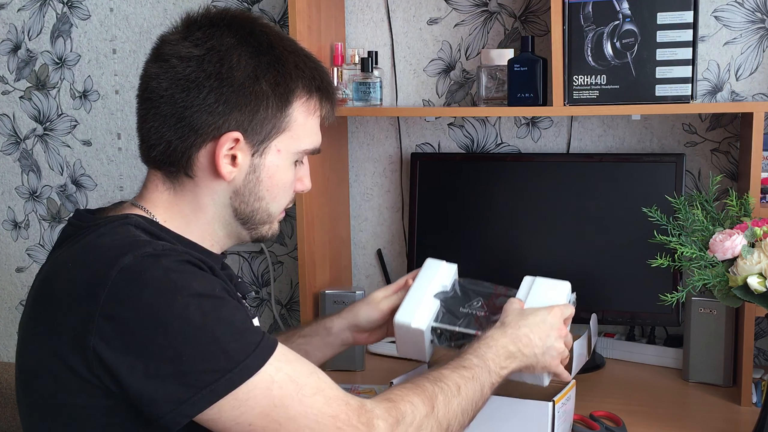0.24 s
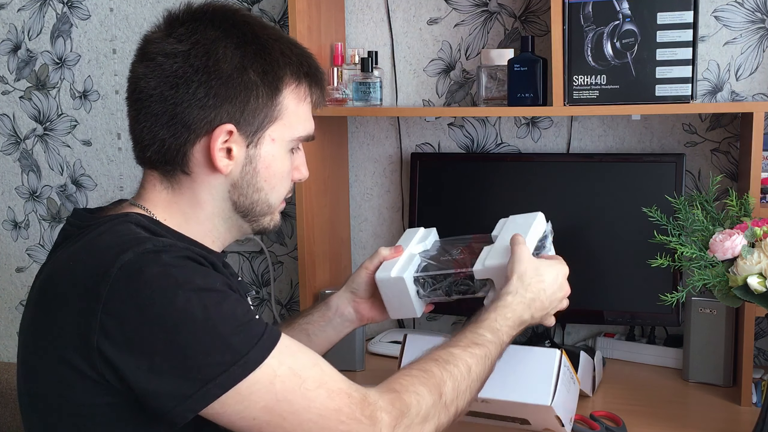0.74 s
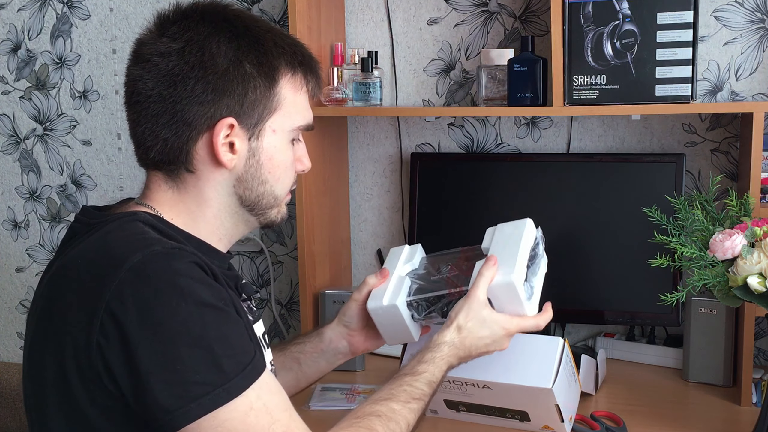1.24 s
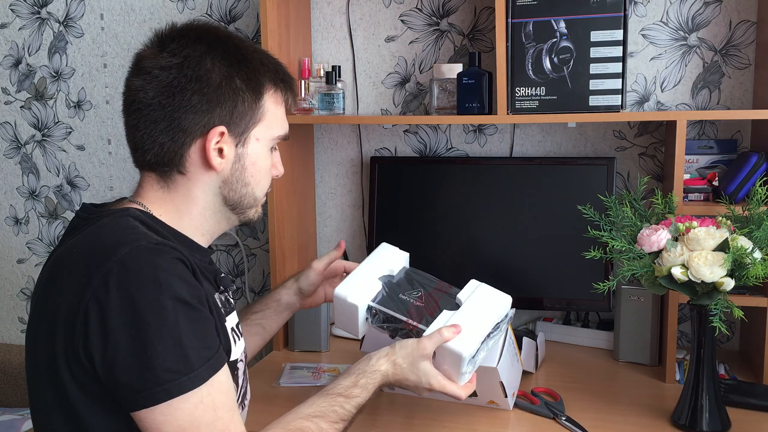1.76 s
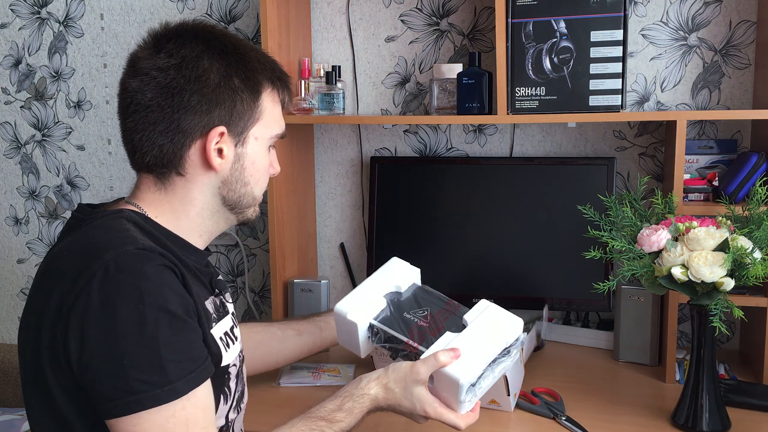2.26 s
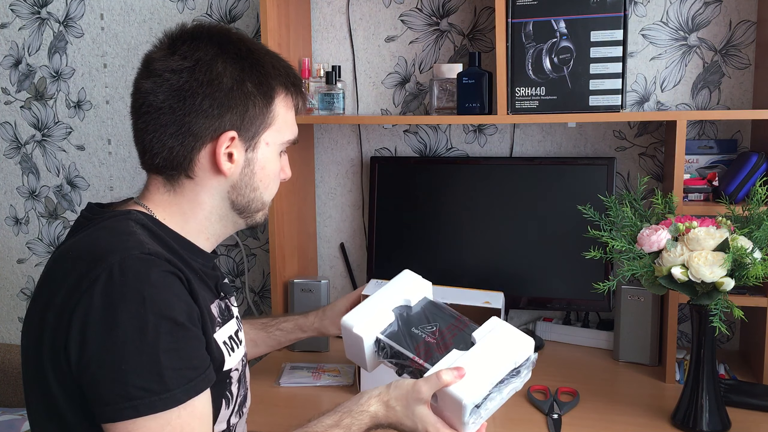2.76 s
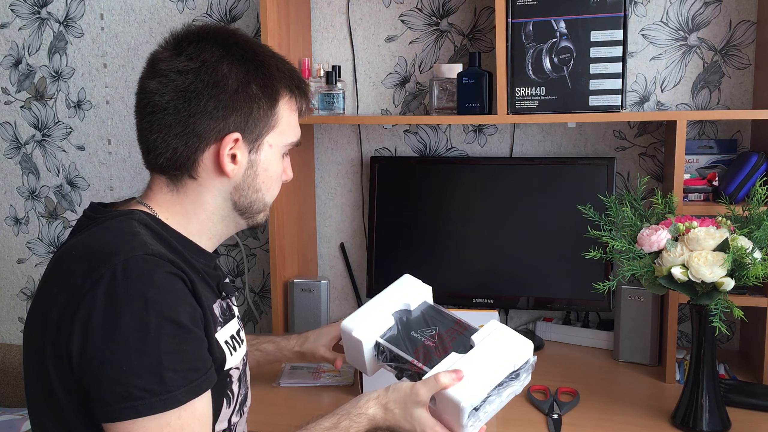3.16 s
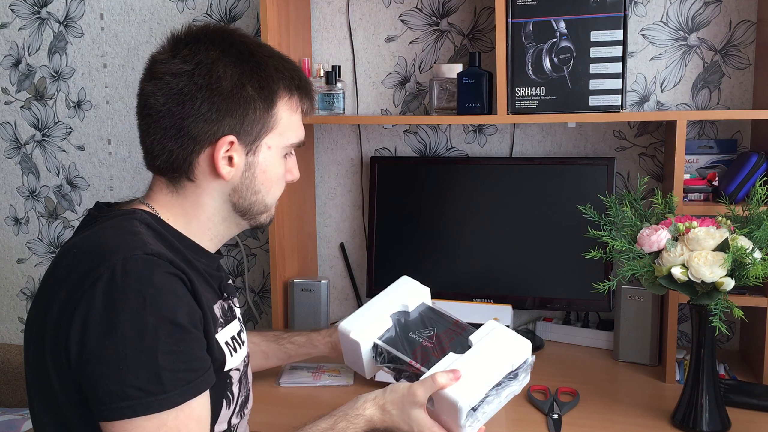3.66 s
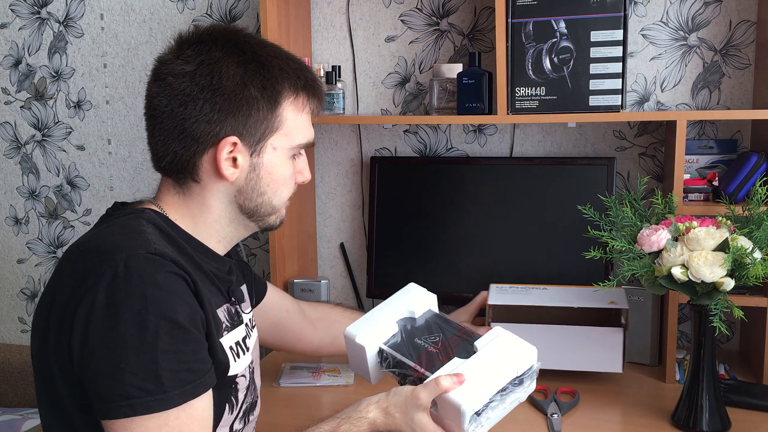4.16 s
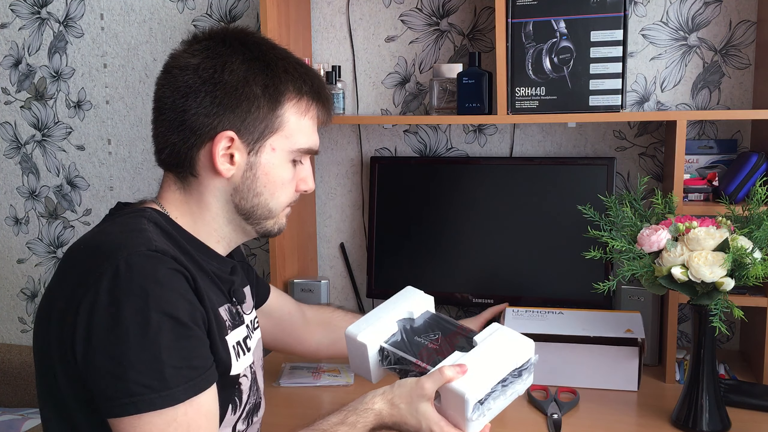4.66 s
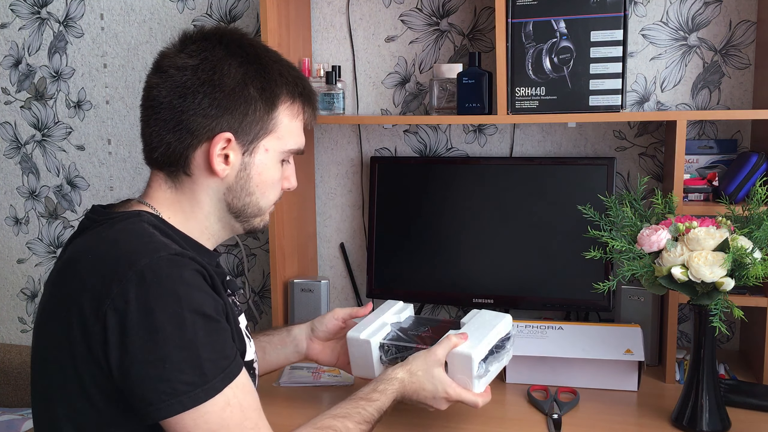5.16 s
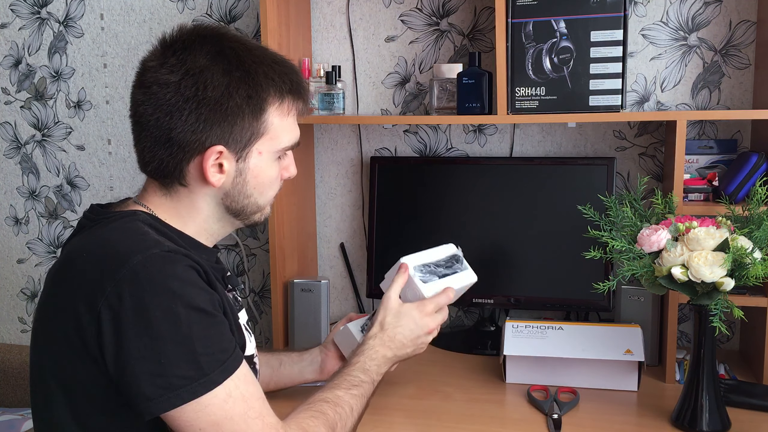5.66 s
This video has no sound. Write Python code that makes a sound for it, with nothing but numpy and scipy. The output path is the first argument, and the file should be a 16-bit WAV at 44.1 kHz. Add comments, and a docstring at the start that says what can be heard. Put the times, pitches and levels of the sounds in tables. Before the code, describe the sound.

Close unboxing sounds: hissing, crackling foam, hollow cardboard thuds with one very loud overloaded knock, card flaps snapping, finally foam creaks and faint squeaks.

```python
"""Unboxing from foam and cardboard

Hands lift a device in polystyrene end caps out of its cardboard box, in a small room.
The foam hisses, ticks, chirps and squeaks under the fingers: random slips, snaps and gliding tones.
The empty box drops, is dragged over the desk and knocks on it: damped modes, noise bursts, friction.
Card flaps swish and snap free. The hardest knocks overload a close microphone, whose gain ducks."""
import sys
import numpy as np
from scipy import signal
from scipy.fft import rfft, irfft, next_fast_len
from scipy.io import wavfile
from scipy.ndimage import map_coordinates

SR = 44100
rng = np.random.default_rng(int(sys.argv[2]) if len(sys.argv) > 2 else 0)


def wrap_up_sound(samples):
    """Save the sound to the file named by the first command line argument, as 16-bit audio."""
    columns = np.atleast_2d(samples).T
    # keep every value between -1 and 1, then stretch to whole-number steps
    tamed = np.clip(columns, -1, 1)
    steps = np.round(tamed * 32767).astype(np.int16)
    wavfile.write(sys.argv[1], SR, steps)


N = 260631

# Room tone spectrum: pitch_hz, level_db (per Hz)
TONE_SPECTRUM = [(300, -25), (520, -11.5), (3000, -3.5), (16000, -21.5)]
# Faint rumble spectrum: pitch_hz, level_db (per Hz)
RUMBLE_SPECTRUM = [(20, -11), (90, -40)]
# Decay of the diffuse room tail: pitch_hz, t60_s
ROOM_DECAY = [(130, 0.3), (1840, 0.26), (4850, 0.21), (14000, 0.13)]
# Furniture boards ringing along, each detuned a little: pitch_hz, level_db
SHELF_MODES = [(285, -2), (505, 1), (715, -13), (1053, 1), (1400, 2.5), (1950, -9.5), (2450, -7.5)]
SHELVES_DB = -20.5  # relative to the diffuse tail
SHELVES_T60_S, SHELVES_SCATTER = 0.38, 0.035  # scatter: typical detuning as a fraction of pitch
ALCOVE_S, ALCOVE_GAIN = 0.006, 0.23  # latest reflection from nearby boards, size of each

# Box pushed over the desk: start_s, length_s, drone_db, scratch_db (both before trims), panel_hz
PUSHES = [(0.0, 0.014, -21, -51, 1030), (0.759, 0.075, -18.5, -45, 780), (2.065, 0.072, -42.5, -50.5, 580),
          (2.23, 0.025, -20, -45, 776), (2.324, 0.064, -15.5, -50, 600), (2.393, 0.033, -16, -41, 576),
          (2.5, 0.88, -19.5, -51, 645), (2.904, 0.076, -21.5, -48.5, 978), (3.034, 0.12, -24, -74.5, 480),
          (3.505, 0.051, -20.5, -37, 488), (3.63, 0.051, -29, -50.5, 520), (3.716, 0.029, -20.5, -53, 469),
          (4.172, 0.034, -33, -57, 446), (4.438, 0.095, -22, -53, 519), (4.6, 0.029, -25, -43.5, 522),
          (4.748, 0.089, -19.5, -49.5, 495)]
# Low cardboard drone spectrum: pitch_hz, level_db (per Hz)
DRONE_SPECTRUM = [(80, -13.5), (130, -1.5), (200, -5.5), (290, 9), (520, 6.5), (800, -1.5), (1100, -3.5),
                  (1450, -6), (2400, -17), (3600, -49)]
# Fine grit spectrum: pitch_hz, level_db (per Hz)
SCRATCH_SPECTRUM = [(1300, -16), (2800, 4), (6500, -4), (16000, -18.5)]
PUSH_ATTACK_S, PUSH_SAG_DB_PER_S = 0.13, 56  # 60 dB of swell, then slowing while pushed
PANEL_Q, PANEL_DB = 3.7, -5  # dragged panel: sharpness, level relative to the rest of the drone

# Fingertips squeaking on foam: level_db, unevenness (of the slips, 0-1), glide [(time_s, slip_rate_hz), ..]
SQUEAKS = [(-45, .07, [(0.25, 6500), (0.35, 9300), (0.46, 9400)]), (-59, .006, [(5.51, 7100), (5.58, 7250),
           (5.72, 9100)]), (-58, .004, [(5.59, 10050), (5.65, 11100), (5.74, 11400)]),
           (-61, .004, [(5.51, 12700), (5.6, 12200), (5.66, 13300)]), (-54, .005, [(5.755, 10300),
           (5.82, 11200)]), (-57, .006, [(5.76, 13800), (5.83, 14800), (5.89, 14300)]),
           (-55, .005, [(5.78, 12900), (5.91, 12300)]), (-53, .06, [(5.77, 3400), (5.91, 3520)]),
           (-52, .07, [(5.78, 2200), (5.91, 2050)]), (-50, .25, [(5.74, 480), (5.91, 420)])]
SQUEAK_RAMP_S = 0.083  # 60 dB of swell or fall as a finger lands or lifts
# Fainter strands: fixed detuning and drift (fractions of pitch), level relative to the main strand
STRAND_SPREAD, STRAND_DRIFT, STRAND_DB = 0.06, 0.006, -7

# Foam slipping in the grip: start_s, level_db (snap peak), body_db (hollow answer relative to the snap)
TICKS = [(0.2216, -37, 13.5), (0.53, -25.5, 6.5), (0.609, -13, -1), (0.898, -33, -28), (1.116, -25, -8.5),
         (1.3145, -23, -6.5), (1.356, -8, -6), (1.6642, -31, -39), (5.373, -16.5, -7), (5.396, -21, -4),
         (5.447, -14, -6.5), (5.472, -13.5, -11.5), (5.495, -11.5, -7.5), (5.6674, -18, 2)]
# Bright snap of foam letting go: pitch_hz, level_db (per Hz)
SNAP_SPECTRUM = [(1000, -18), (2000, -2), (7200, -2), (16000, -7)]
# Hollow tone of the foam block: pitch_hz, level_db (per Hz)
HOLLOW_SPECTRUM = [(520, -0.5), (780, -1.5), (1200, -4), (2100, -6.5), (3000, -9)]

# Hands sliding on foam: fastest_s, half_length_s, hiss_db, hollow_db (both before trims)
RUBS = [(0.332, 0.067, -32.5, -32.5), (0.474, 0.072, -41.5, -33), (0.622, 0.16, -59, -43),
        (0.9, 0.023, -34, -29.5), (1.044, 0.05, -41.5, -31.5), (1.126, 0.043, -37, -38),
        (1.234, 0.049, -47, -36), (1.322, 0.0094, -32, -25), (1.375, 0.056, -39.5, -47),
        (1.553, 0.078, -51.5, -49.5), (1.94, 0.043, -61.5, -61), (5.306, 0.045, -32, -39.5),
        (5.385, 0.054, -36.5, -31.5), (5.624, 0.33, -53.5, -47), (5.836, 0.2, -67.5, -40.5)]
# Hiss of skin on beads: pitch_hz, level_db (per Hz)
HISS_SPECTRUM = [(1200, 6), (1900, 9.5), (2900, -5.5), (4000, 10), (9300, 7), (16000, 6)]
RUB_SHAPE, RUB_LINGER = 1.7, 0.9  # exponent of a stroke's bell, its fall over its rise

STUTTER_START_S, STUTTER_FIRST_GAP_S, STUTTER_LAST_GAP_S = 0.4655, 0.01, 0.006
STUTTER_SETTLE = 0.4  # share of the slack left after each slip
STUTTER_DB, STUTTER_GROWTH_DB = -20, 7.5  # full strength, how much weaker the first snap is

# Box on desk (the row at 1.352 s is the foam block, sounded alike): start_s, level_db (panel peak), panel_hz,
# edge_hz,
KNOCKS = [(0.72, -13, 750, 1625, -18, -8), (0.73, -16.5, 312, 1340, -30, -10.5),
          (0.767, -18, 490, 1410, -6, -7.5), (0.7941, -10, 758, 1420, -8, -14.5),
          (0.816, -17, 484, 1536, -13, 1.5), (0.893, -13.5, 757, 1370, -15.5, -22),
          (1.352, -19.5, 456, 1333, -11.5, -2.5), (2.073, -28, 612, 1178, -3, -5),
          (2.32, -13.5, 750, 1110, -6, -10), (2.381, -5.5, 623, 1510, -28, -4),
          (2.4, -10, 560, 1065, -13, 1), (2.465, 10.5, 658, 1480, -26, -4),
          (2.474, 1.5, 785, 1460, -16, 0.5), (2.508, -13, 720, 1423, -8, 3),
          (2.807, -17.5, 497, 1153, -15.5, -20.5), (2.8994, -8.5, 950, 1980, -9.5, 4),
          (3.018, -8.5, 425, 1129, -13, -22.5), (3.0245, -5.5, 502, 1350, -12, -7.5),
          (3.487, -14, 369, 1763, -25, -9.5), (3.497, -24.5, 970, 2760, -26, 1.5),
          (3.546, -17.5, 497, 1480, -4.5, -19), (3.676, -20, 506, 1410, -18, -11.5),
          (3.719, -17, 517, 1422, -34, 0.5), (4.178, -27, 429, 1426, -46, 5.5),
          (4.412, -2.5, 912, 1574, -24.5, -13), (4.574, -12, 523, 1170, -14.5, -18.5),
          (4.748, -6, 524, 1450, -44, -6)]
# Cardboard panel modes, level varied per blow: pitch_hz, level_db, t60_s
PANEL_MODES = [(311.7, -7.5, 0.12), (362, -2.5, 0.013), (487, -2, 0.01), (755, -10.5, 0.0028)]
# Loose panels rattling: pitch_hz, level_db (per Hz)
RATTLE_SPECTRUM = [(230, -9), (330, 7), (830, 1.5), (1050, -10.5)]
# Thump of the desk: pitch_hz, level_db (per Hz)
THUMP_SPECTRUM = [(85, -12), (135, 2), (190, -1), (260, 3.5), (380, -24.5)]
# Clack of the stiff box edge: pitch_hz, level_db (per Hz)
EDGE_SPECTRUM = [(800, -3), (1350, -3.5), (3200, -17), (6000, -33.5)]
# Sharp crack of a contact: pitch_hz, level_db (per Hz)
CRACK_SPECTRUM = [(1500, 3.5), (2800, 6.5), (5000, 7.5), (16000, -19)]
RATTLE_S, RATTLE_HALVING_DB = 0.029, 22  # t60 of a 0 dB blow; one this much stronger lasts half as long
CRACK_DB, CRACK_PER_HARDNESS = -20.5, 0.75  # level at hardness 0, dB gained per dB of hardness

# Single beads catching and letting go: start_s, level_db (peak), pitch_hz
CHIRPS = [(1.443, -31, 4830), (1.492, -32.5, 5100), (1.752, -37.5, 5230), (1.9364, -35.5, 3750),
          (5.1957, -30, 7360), (5.2255, -29, 7250), (5.4422, -17.5, 7750), (5.5, -18, 7650),
          (5.5424, -25.5, 6400)]

# A card flap drags past the box's rim and snaps free: snap_s, snap_db (peak), swish_db, scrape_db, flap_hz
FLAPS = [(2.898, -6.5, -37, -34.5, 1845), (3.721, -14.5, -48.5, -48.5, 1450), (4.75, -7, -38, -38, 1400)]
# Card scraping on card: pitch_hz, level_db (per Hz)
CARD_SPECTRUM = [(600, 2.5), (1040, 6), (1600, -1.5), (2400, 1.5), (3300, -1.5), (4200, -13.5)]
SWISH_S, SCRAPE_S = 0.026, 0.11  # drag before the snap, scrape held after it

TOP_HZ = 16000  # upper band limit


def amp(db):
    """Decibels to gain."""
    return 10 ** (np.asarray(db) / 20)


def unit(x):
    """Scale to rms 1."""
    return x / np.sqrt(np.mean(x ** 2) + 1e-20)


def crest(x):
    """Scale to peak 1."""
    return x / np.abs(x).max()


def along(points, hz):
    """(Hz, value) points read on a log frequency axis."""
    f, v = np.transpose(points)
    return np.interp(np.log(hz + 1), np.log(f), v)


def fade(t, t60):
    """Exponential decay, 60 dB in t60 seconds."""
    return np.exp(-np.log(1000) * t / np.maximum(t60, 1e-3))


def wobble(rate, size=N):
    """A smooth random curve, rate knots a second."""
    knots = rng.standard_normal(int(size * rate / SR) + 4)
    return map_coordinates(knots, [np.arange(size) * rate / SR])


def colour(x, spectrum):
    """Causal, minimum-phase filter with the given spectrum, falling steeply beyond its ends."""
    m = 2 * next_fast_len(len(x) // 2 + 4096)
    hz = np.fft.rfftfreq(m, 1 / SR)
    low_skirt = 1 + (0.72 * spectrum[0][0] / (hz + 1)) ** 8
    high_skirt = 1 + (0.6 * hz / spectrum[-1][0]) ** 4
    gain = amp(along(spectrum, hz)) / low_skirt / high_skirt
    # folding the cepstrum forward in time keeps the attacks sharp
    cepstrum = irfft(np.log(gain + 1e-6))
    cepstrum[1:m // 2] *= 2
    cepstrum[m // 2 + 1:] = 0
    return irfft(rfft(x, m) * np.exp(rfft(cepstrum)))[:len(x)]


def add(track, s, sound):
    """Mix a sound in at time s."""
    part = track[max(round(s * SR), 0):][:len(sound)]
    part += sound[:len(part)]


def resonate(x, hz, q):
    """x through one resonance; rms 1."""
    return unit(signal.lfilter(*signal.iirpeak(hz, q, SR), x))


def ring(t, hz, t60):
    """One damped mode that builds up over a soft contact; peak 1."""
    return crest(np.sin(2 * np.pi * hz * t) * fade(t, t60) * (1 - fade(t, 0.087)))


def burst(t, t60, spectrum, rough):
    """One contact and the micro-contacts that crowd in after it; peak 1."""
    force = rng.standard_normal(len(t)) * fade(t, t60) * (1 - fade(t, 0.02))
    force *= rough / np.linalg.norm(force)
    force[0] += 1
    return crest(colour(force, spectrum))


def friction(spectrum, rate, spread_db, smooth):
    """Tiny slips of uneven size, coming in clumps, over a smooth rush; rms 1."""
    chance = rate / SR * amp(4 * wobble(130))
    size = amp(spread_db * np.clip(rng.standard_normal(N), -2, 2))
    slips = (rng.random(N) < chance) * rng.choice([-1, 1], N) * size
    return unit(colour(unit(slips) + smooth * rng.standard_normal(N), spectrum))


def room(x, wet_db, gap=0.0045, shelf=0.11, count=6):
    """Direct sound, board reflections, ringing shelves, and a diffuse tail whose treble dies first."""
    hz, t, z = signal.stft(rng.standard_normal(SR * 2 // 3), SR, nperseg=256)
    tail_decay = fade(t, along(ROOM_DECAY, hz)[:, None])
    tail = signal.istft(z * tail_decay, SR, nperseg=256)[1]
    t = np.arange(len(tail)) / SR
    tail *= 1 - np.exp(-(t / gap) ** 2)  # the tail builds up over gap seconds
    boards = np.zeros(len(tail))
    for pitch_hz, level_db in SHELF_MODES:
        detuned_hz = pitch_hz * (1 + rng.normal(0, SHELVES_SCATTER))
        boards += amp(level_db) * ring(t, detuned_hz, SHELVES_T60_S)
    answer = tail / np.linalg.norm(tail) + amp(SHELVES_DB) * boards / np.linalg.norm(boards)
    answer *= amp(wet_db)
    reflections = (rng.random(count) * ALCOVE_S * SR).astype(int)
    answer[reflections] += ALCOVE_GAIN * rng.choice([-1, 1], count)
    answer[[0, round(0.0076 * SR)]] = 1, shelf  # direct sound, one steady reflection
    return signal.fftconvolve(x, answer)


def room_tone():
    """Shaped noise for the very quiet air of the room."""
    return amp(-81.0) * unit(colour(rng.standard_normal(N), TONE_SPECTRUM))


def faint_rumble():
    """Low noise whose level comes and goes by up to 10 dB either way."""
    sway_db = 10 * np.tanh(2 * wobble(4))
    return amp(-61.0 + sway_db) * unit(colour(rng.standard_normal(N), RUMBLE_SPECTRUM))


def push(start, length, release=0.18, attack=PUSH_ATTACK_S):
    """Gain of one push: a quick swell, a hold that sags as the box slows, a release (s for 60 dB)."""
    t = np.arange(N) / SR - start
    hold = amp(-PUSH_SAG_DB_PER_S * np.clip(t, 0, length))
    return fade(np.maximum(-t, 0), attack) * hold * fade(np.maximum(t - length, 0), release)


def box_slides():
    """Cardboard judders over the desk: coarse slips drive the box and the dragged panel; fine ones scratch."""
    out = np.zeros(N)
    drone = friction(DRONE_SPECTRUM, rate=160, spread_db=-1.5, smooth=0.53)
    grit = amp(-4.5) * friction(SCRATCH_SPECTRUM, rate=260, spread_db=2, smooth=0.2)
    for start, length, drone_db, scratch_db, panel_hz in PUSHES:
        body = amp(-12.5) * (drone + amp(PANEL_DB) * resonate(drone, panel_hz, PANEL_Q))
        out += push(start, length) * (amp(drone_db) * body + amp(scratch_db) * grit)
    judder = amp(2.5 * wobble(60))
    return room(judder * out, wet_db=-3.0)[:N]


def foam_squeaks(count=5):
    """Fingertips stick and slip fast: even slips whistle, uneven ones hiss; skin ridges add faint strands."""
    out = np.zeros(N)
    for db, uneven, glide in SQUEAKS:
        s, hz = np.transpose(glide)
        t = np.arange(s[0] - SQUEAK_RAMP_S, s[-1] + SQUEAK_RAMP_S, 1 / SR)
        off_touch = np.maximum(s[0] - t, 0) + np.maximum(t - s[-1], 0)
        touch = fade(off_touch, SQUEAK_RAMP_S)
        for faint in np.arange(count) > 0:  # the first strand is the main one
            detune = faint * (rng.normal(0, STRAND_SPREAD) + STRAND_DRIFT * wobble(17, len(t)))
            pitch = np.interp(t, s, hz) * (1 + detune + uneven * wobble(2500, len(t)))
            level = amp(db + faint * STRAND_DB + 1.7 * wobble(59, len(t)))
            add(out, t[0], touch * level * np.sin(2 * np.pi * np.cumsum(pitch) / SR))
    return room(out, wet_db=-25)[:N]


def snap(body_db):
    """Foam sticks and lets go: a dry snap and the hollow answer of the block."""
    t = np.arange(SR // 12) / SR
    dry_snap = burst(t, 0.004, SNAP_SPECTRUM, rough=2)
    return dry_snap + amp(body_db) * burst(t, 0.02, HOLLOW_SPECTRUM, rough=0.5)


def foam_ticks():
    """Single snaps as the grip shifts and the foam slips."""
    out = np.zeros(N)
    for s, db, body_db in TICKS:
        add(out, s, amp(db) * room(snap(body_db), wet_db=-7))
    return out


def stroke(middle, half_length):
    """Gain of one stroke of the hand: a bell, as it speeds up and slows down."""
    u = (np.arange(N) / SR - middle) / half_length
    return np.exp(-np.maximum(-u, u / RUB_LINGER) ** RUB_SHAPE)


def foam_rubs():
    """Skin drags over the foam beads; the light block radiates the hiss and adds a hollow tone."""
    hiss, hollow = np.zeros(N), np.zeros(N)
    for middle, half_length, hiss_db, hollow_db in RUBS:
        bell = stroke(middle, half_length)
        hiss += amp(hiss_db) * bell
        hollow += amp(hollow_db) * bell
    grip = amp(1.9 * wobble(55))
    beads = amp(-1.5) * friction(HISS_SPECTRUM, rate=3300, spread_db=-5, smooth=0.55)
    # now and then a single bead catches
    crackle = amp(-8.5) * friction(SNAP_SPECTRUM, rate=80, spread_db=3.5, smooth=0)
    block = hollow * friction(HOLLOW_SPECTRUM, rate=600, spread_db=4, smooth=0.4)
    return room(grip * (hiss * (beads + crackle) + amp(-10.5) * block), wet_db=-9.5)[:N]


def foam_stutter(count=7):
    """The same spot sticks and slips again and again, quickly settling to a faster, harder beat."""
    out, s, slip = np.zeros(N), STUTTER_START_S, snap(body_db=0.5)
    for slack in STUTTER_SETTLE ** np.arange(count):
        add(out, s, amp(STUTTER_DB - STUTTER_GROWTH_DB * slack) * slip)
        s += STUTTER_LAST_GAP_S + (STUTTER_FIRST_GAP_S - STUTTER_LAST_GAP_S) * slack
    return room(out, wet_db=-12)[:N]


def panel_shell(t):
    """The box's panel modes ringing together, each a little louder or softer from blow to blow; peak 1."""
    shell = np.zeros(len(t))
    for k, (hz, level_db, t60) in enumerate(PANEL_MODES):
        shell += (-1) ** k * amp(level_db + rng.normal(0, 1.0)) * ring(t, hz, t60)
    return crest(shell)


def box_knocks():
    """Each blow rings the panels, most of all the one struck; desk thumps, stiff edge clacks and cracks."""
    out, t = np.zeros(N), np.arange(SR // 4) / SR
    for s, db, panel_hz, edge_hz, thump_db, hardness_db in KNOCKS:
        rattle_t60 = RATTLE_S * 2 ** (-db / RATTLE_HALVING_DB)
        crack_db = CRACK_DB + CRACK_PER_HARDNESS * hardness_db
        rattle = burst(t, rattle_t60, RATTLE_SPECTRUM, rough=3.3)
        panels = crest(1.1 * ring(t, panel_hz, 0.015) + 0.23 * panel_shell(t) + 0.74 * rattle)
        thump = crest(burst(t, 0.027, THUMP_SPECTRUM, rough=0.52) + 0.31 * ring(t, 130, 0.23))
        clack = burst(t, rattle_t60, EDGE_SPECTRUM, rough=2.5)
        edge = crest(clack + 0.9 * ring(t, edge_hz, 0.014))
        crack = burst(t, 0.06 * rattle_t60, CRACK_SPECTRUM, rough=17)
        blow = panels + amp(thump_db) * thump + amp(hardness_db) * edge + amp(crack_db) * crack
        add(out, s, amp(db) * room(blow, wet_db=-9.5))
    return out


def foam_chirps():
    """A single bead lets go: a small tick with a pitch, a few cycles long."""
    out, t = np.zeros(N), np.arange(SR // 12) / SR
    for s, db, hz in CHIRPS:
        tick = burst(t, 0.0021, SNAP_SPECTRUM, rough=0.85)
        pitched = resonate(resonate(tick, hz, q=3.6), hz, q=3.6)
        add(out, s, amp(db) * crest(pitched))
    return room(out, wet_db=-11.5)[:N]


def box_flaps():
    """Card swishes over card, snaps brightly and scrapes on along the box wall, singing at the flap's pitch."""
    out, t = np.zeros(N), np.arange(SR // 12) / SR
    card = friction(CARD_SPECTRUM, rate=740, spread_db=-2.5, smooth=0.41)
    grit = friction(SCRATCH_SPECTRUM, rate=2300, spread_db=2.5, smooth=0.46)
    for s, db, swish_db, scrape_db, flap_hz in FLAPS:
        add(out, s, amp(db) * burst(t, 0.0012, CRACK_SPECTRUM, rough=20.0))
        swish = push(s - SWISH_S, SWISH_S, release=SWISH_S, attack=SWISH_S) * grit
        scrape = push(s, SCRAPE_S) * unit(card + resonate(card, flap_hz, q=13))
        out += amp(swish_db) * swish + amp(scrape_db) * scrape
    return room(out, wet_db=-16.0)[:N]


def scene():
    """Box and foam over a very quiet room with a faint rumble that comes and goes."""
    background = room_tone() + faint_rumble()
    box = box_slides() + box_knocks() + box_flaps()
    foam = foam_squeaks() + foam_ticks() + foam_rubs() + foam_stutter() + foam_chirps()
    return (background + box + foam)[None]


def record(dry, release=0.036, duck=6, attack=0.002):
    """The input clips; a few ms after each overload the gain dips, then recovers; then the band limit."""
    ceiling = 0.72
    overload = np.maximum(np.abs(dry) / ceiling - 1, 0)
    for seconds in (attack, release):  # two smoothers delay and stretch the dip
        step = 1 / (seconds * SR)
        overload = signal.lfilter([step], [1, step - 1], overload)
    wave = np.clip(dry, -ceiling, ceiling) / (1 + np.minimum(duck * overload, 1))
    m = next_fast_len(N + SR // 2)
    in_band = np.fft.rfftfreq(m, 1 / SR) < TOP_HZ
    return irfft(rfft(wave, m) * in_band, m)[..., :N]


dry = scene()
out = record(dry)
wrap_up_sound(out)
```